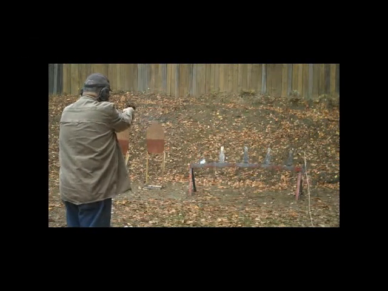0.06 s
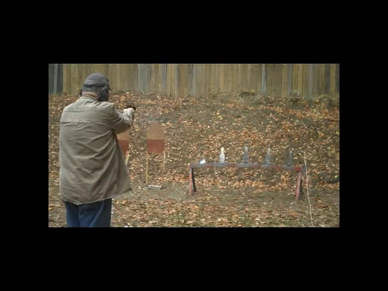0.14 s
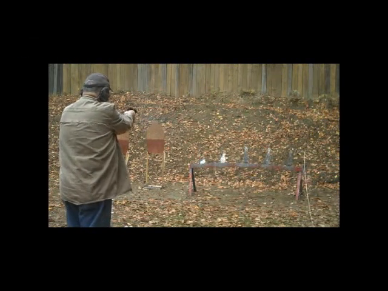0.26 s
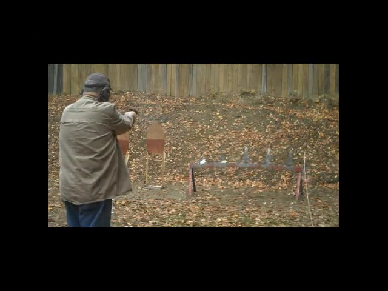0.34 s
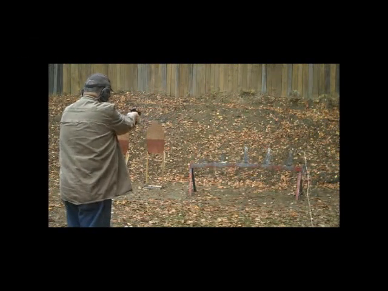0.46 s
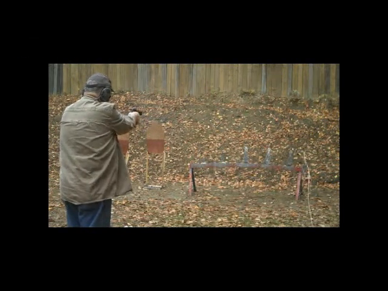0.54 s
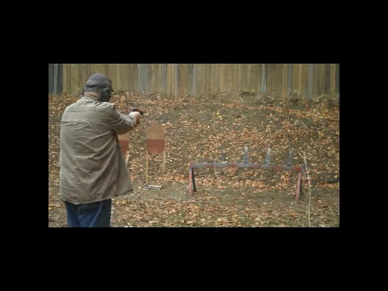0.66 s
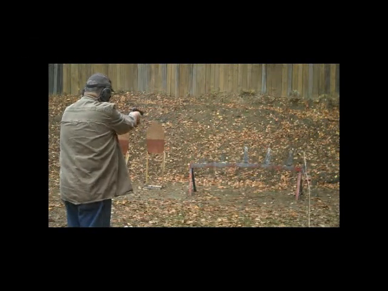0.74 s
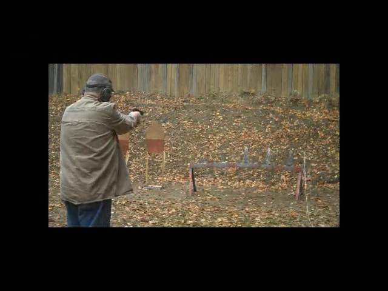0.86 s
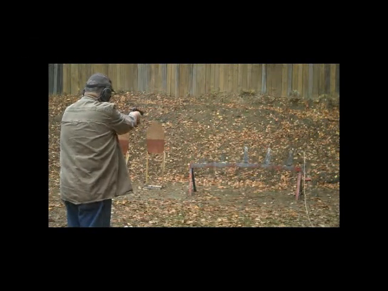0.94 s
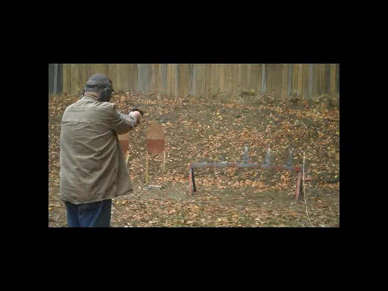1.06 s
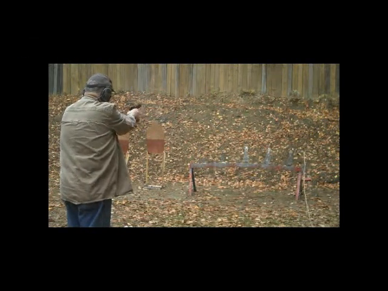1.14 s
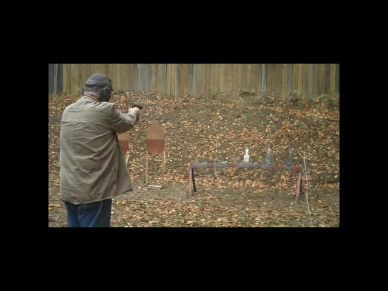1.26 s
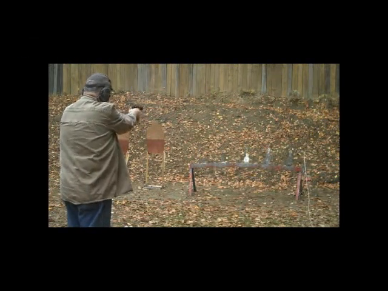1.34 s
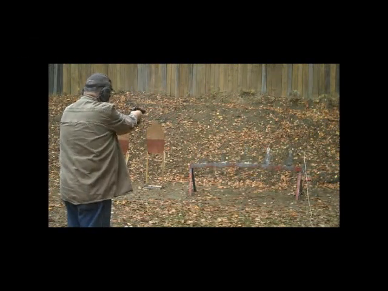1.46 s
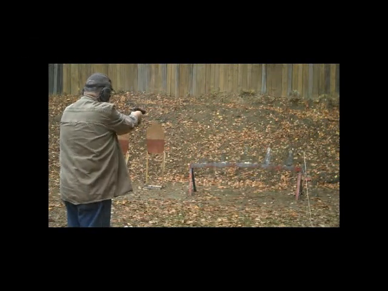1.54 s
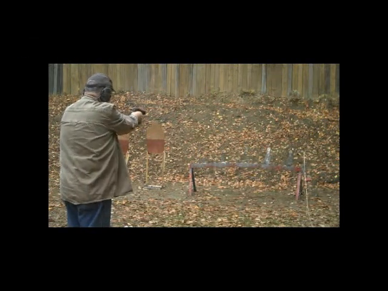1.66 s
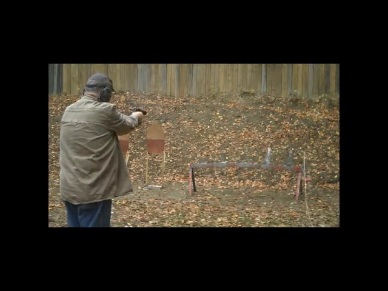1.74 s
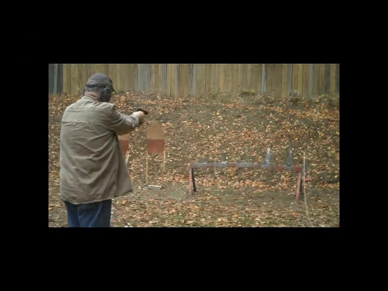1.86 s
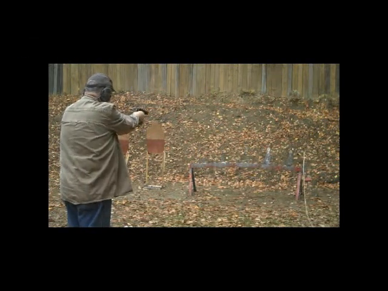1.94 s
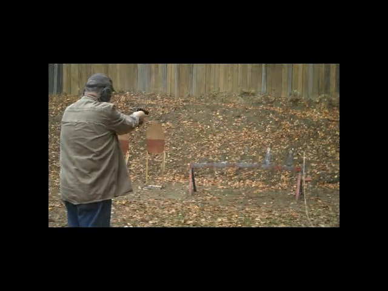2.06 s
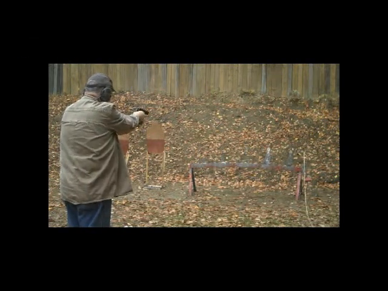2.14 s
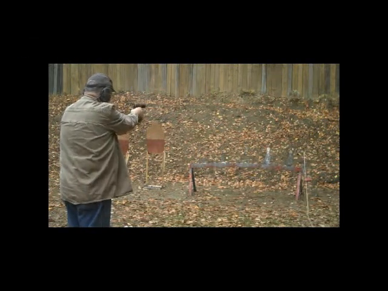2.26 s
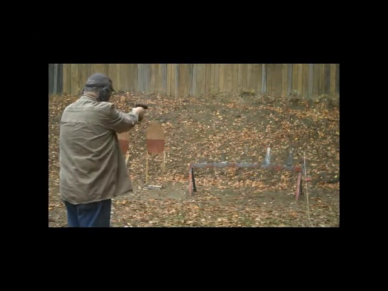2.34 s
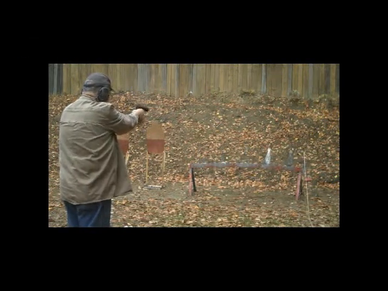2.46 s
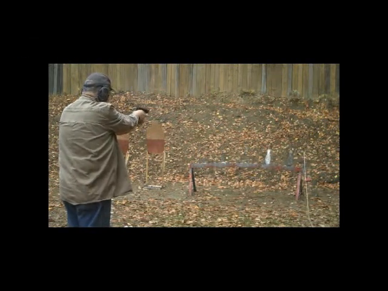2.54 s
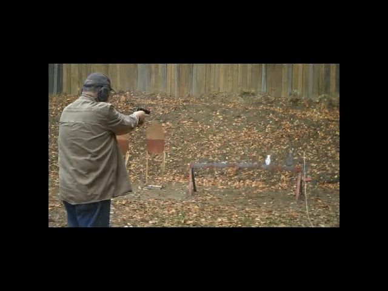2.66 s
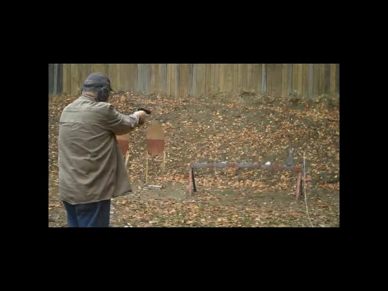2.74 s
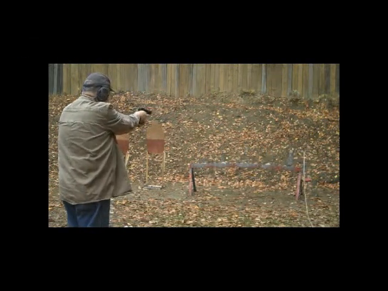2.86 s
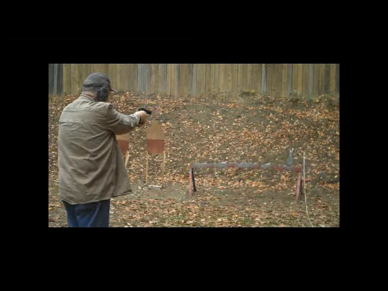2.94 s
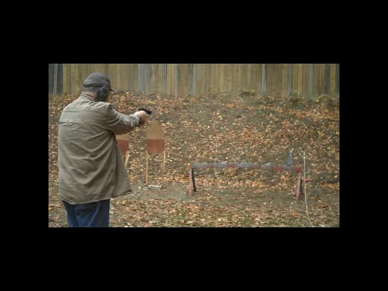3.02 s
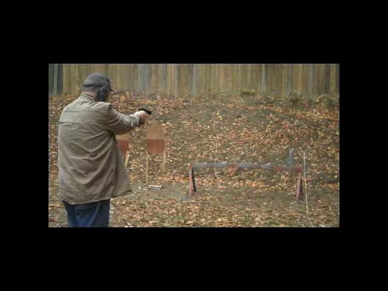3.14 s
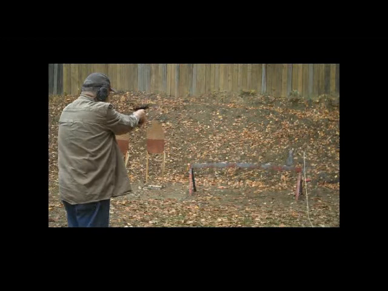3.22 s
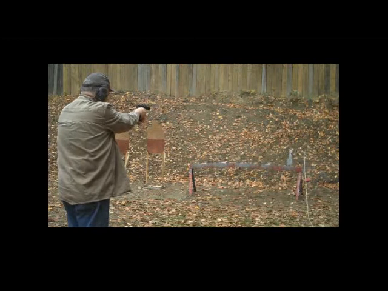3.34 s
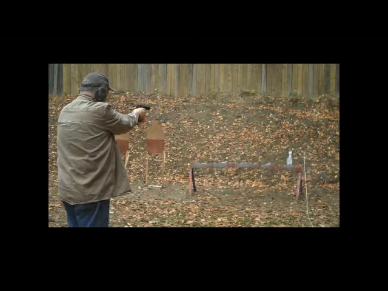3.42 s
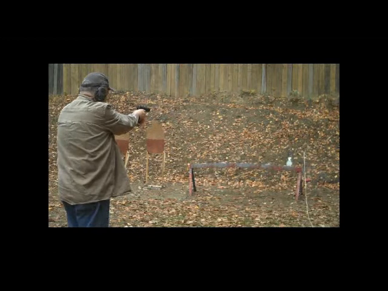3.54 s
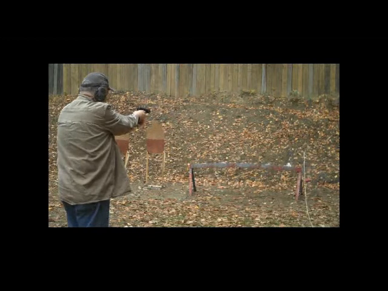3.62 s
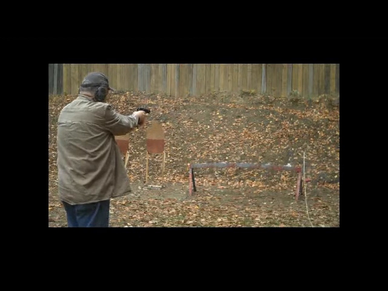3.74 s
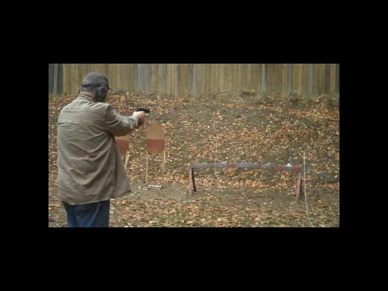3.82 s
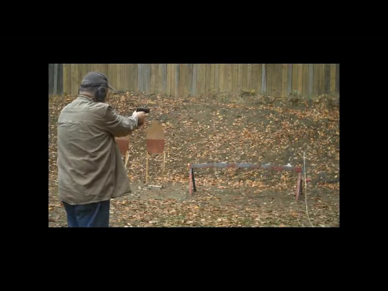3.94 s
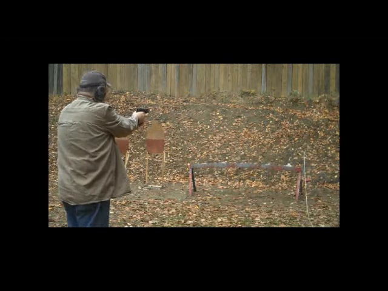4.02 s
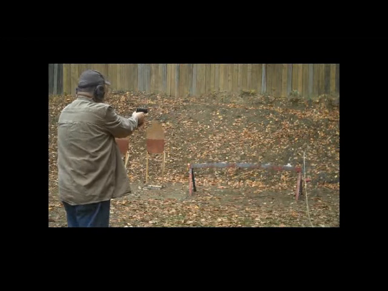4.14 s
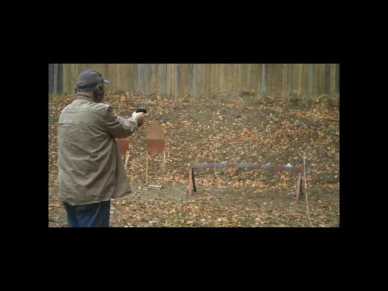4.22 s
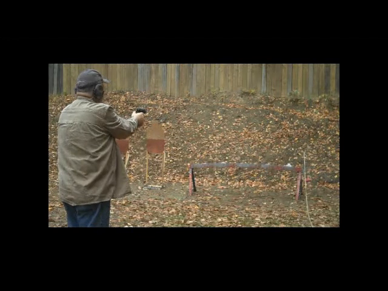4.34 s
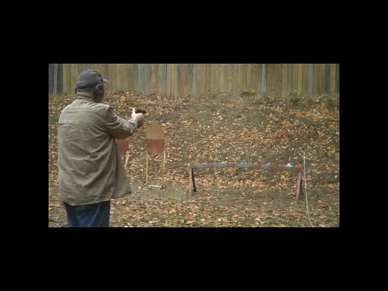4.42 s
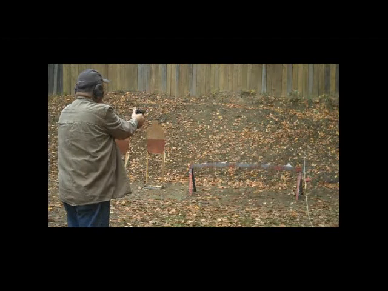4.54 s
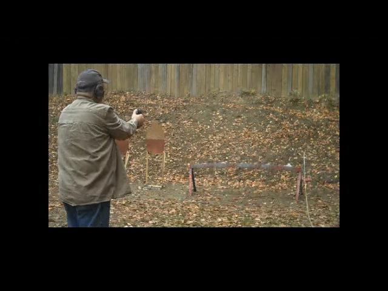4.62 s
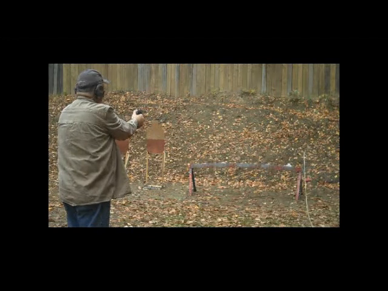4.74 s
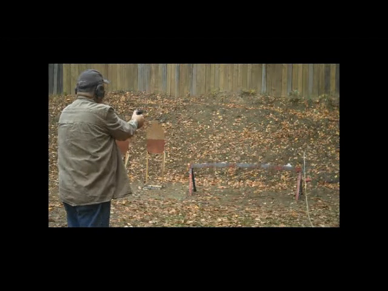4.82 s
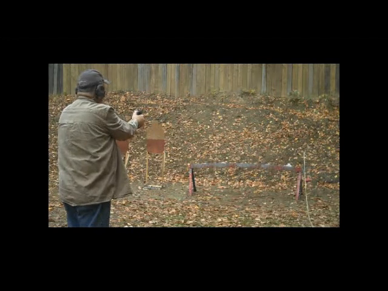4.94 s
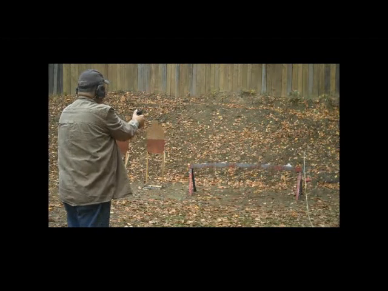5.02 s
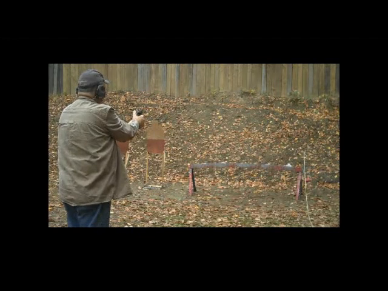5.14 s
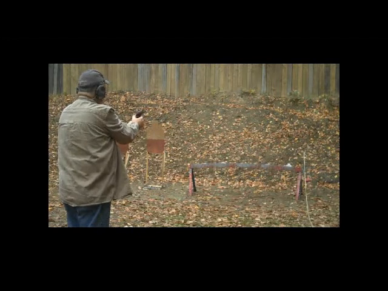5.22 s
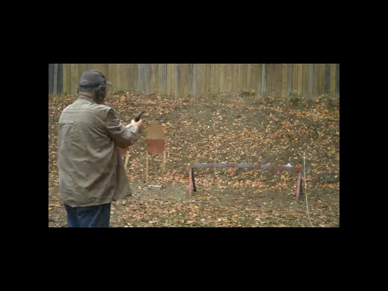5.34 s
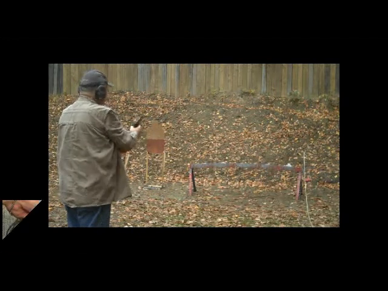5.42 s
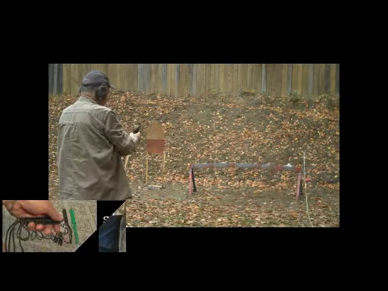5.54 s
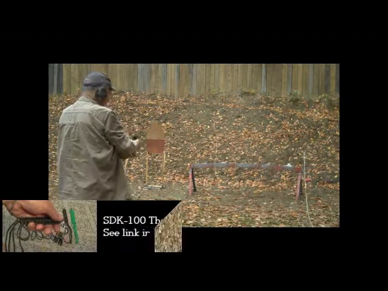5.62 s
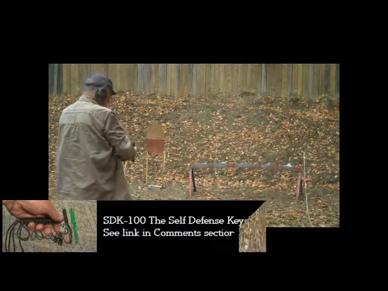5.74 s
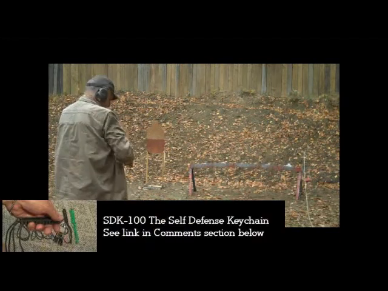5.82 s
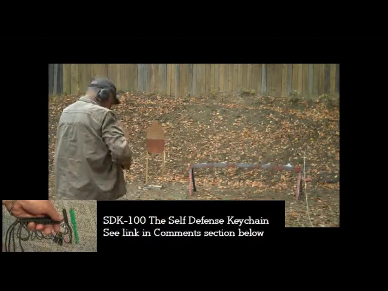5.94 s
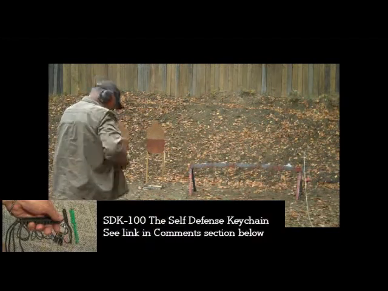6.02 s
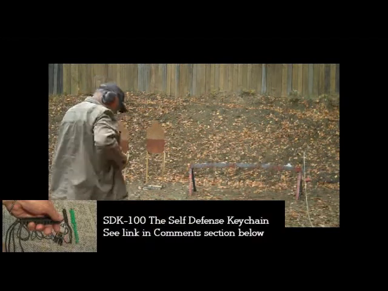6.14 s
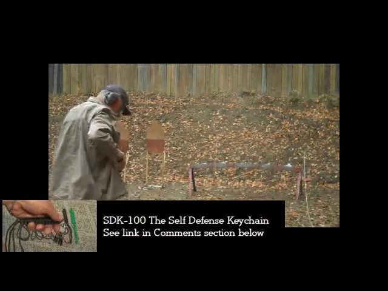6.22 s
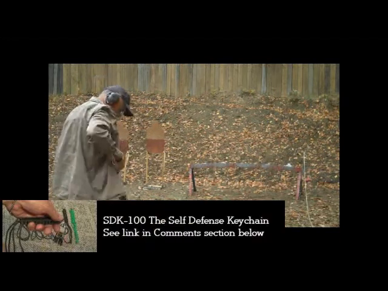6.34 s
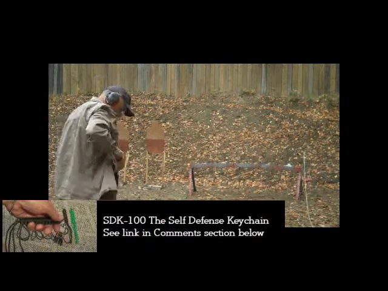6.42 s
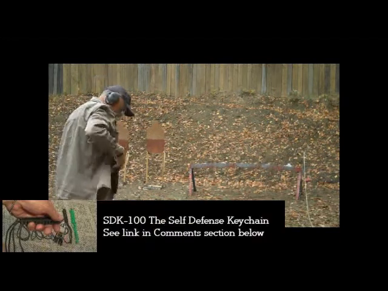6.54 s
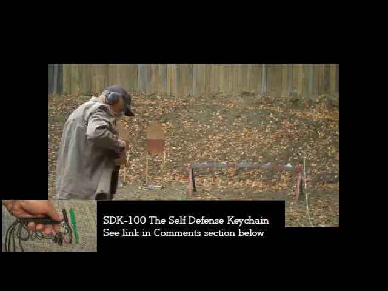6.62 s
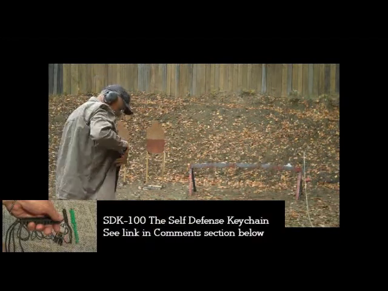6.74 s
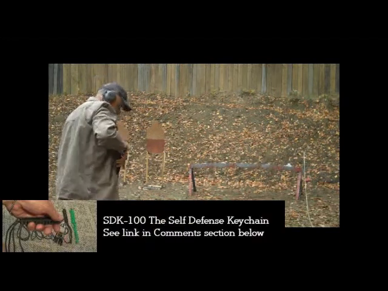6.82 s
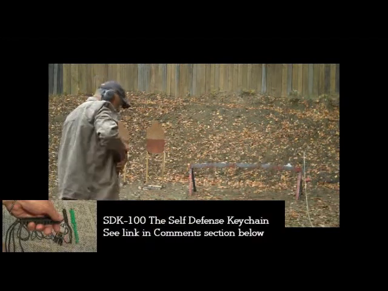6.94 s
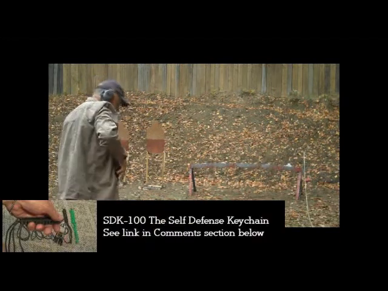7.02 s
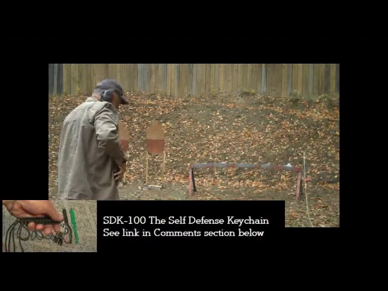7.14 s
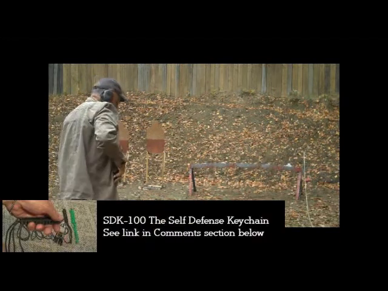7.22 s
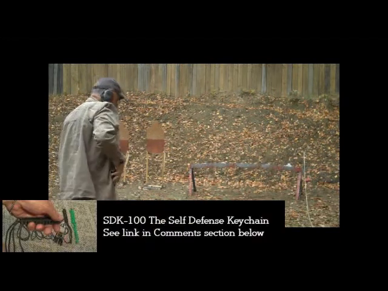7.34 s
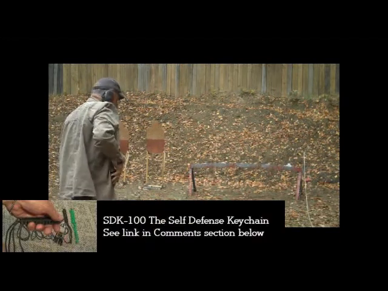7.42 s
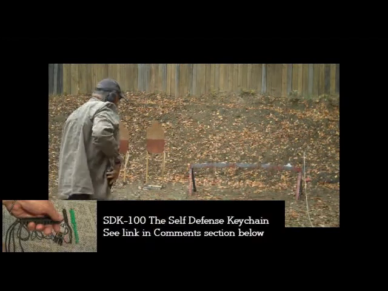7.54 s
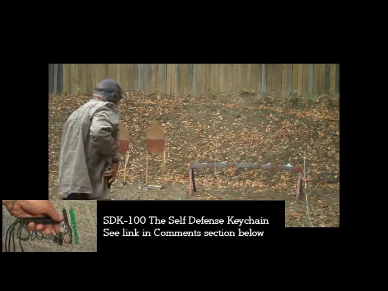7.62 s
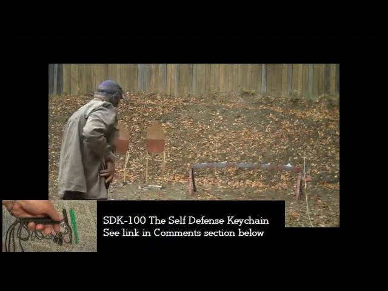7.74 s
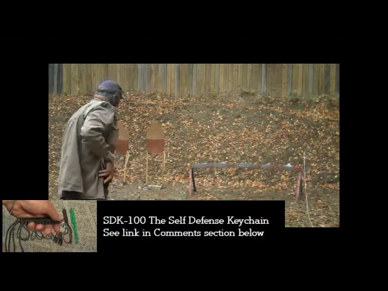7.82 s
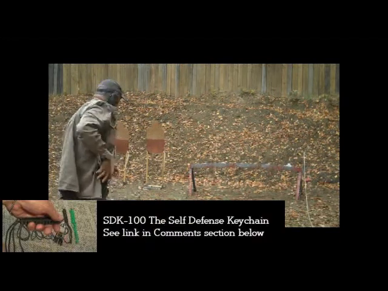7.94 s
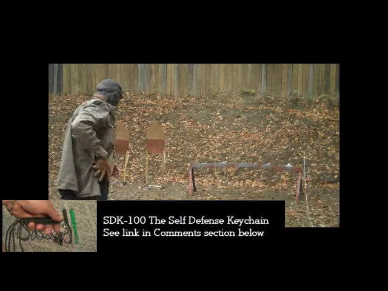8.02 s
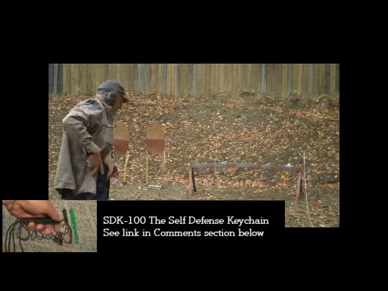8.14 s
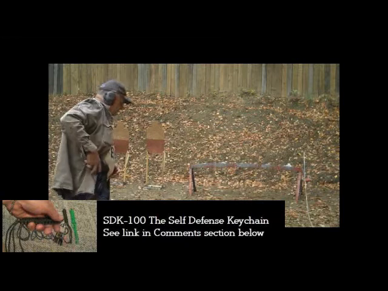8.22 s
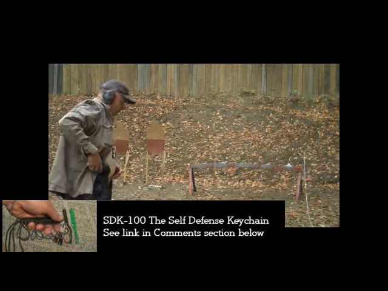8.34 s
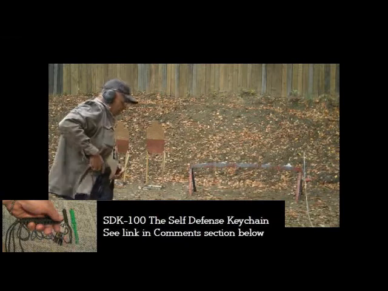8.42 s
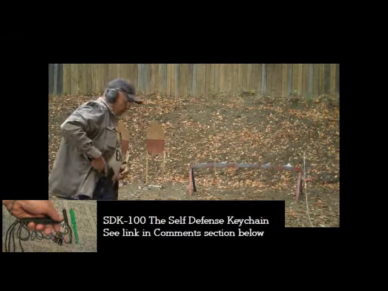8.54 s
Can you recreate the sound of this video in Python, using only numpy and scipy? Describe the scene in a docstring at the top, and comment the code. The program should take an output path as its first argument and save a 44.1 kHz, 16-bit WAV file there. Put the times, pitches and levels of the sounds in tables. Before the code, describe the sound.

The sound opens on the tail of a loud pistol shot outdoors, and three more follow at about 1.1, 2.2 and 3.2 seconds. Each blast echoes through the woods and sets a steel plate ringing with a high, wavering tone. About half a second after each shot the plate topples and clatters lightly on its rack. Spent brass cases ping faintly on the ground until about 4.5 seconds. At 4.8 seconds the slide snaps shut with a sharp metallic click. A very faint breeze lies underneath, with a distant insect barely trilling three times between 4.5 and 6 seconds. Small handling ticks follow, and from 6.3 to 7 seconds the pistol knocks and scrapes into a stiff, hollow holster. A jacket rustles softly from about 6 seconds, with a few sleeve swishes and one small click before the end at about 8.5 seconds.

```python
"""Outdoors, before a leafy bank and a wooden fence, we open on the tail of a pistol shot; three more follow.
Each bullet sets a steel plate ringing while the blast echoes through the woods. The plate topples and
clatters on its rack, and a brass case pings on the ground. After the last shot a far insect trills in
the breeze and the slide snaps shut. The pistol knocks and scrapes its way into a stiff holster under a
rustling jacket, and the sleeve swishes to close the scene."""
import sys
import numpy as np
from scipy import signal
from scipy.fft import rfft, irfft, next_fast_len
from scipy.io import wavfile
from scipy.ndimage import map_coordinates

SR = 44100
rng = np.random.default_rng(int(sys.argv[2]) if len(sys.argv) > 2 else 0)


def store_pcm(level_fs):
    """Save levels as 16-bit WAV."""
    pcm = np.round(np.clip(level_fs, -1, 1) * 32767).astype(np.int16)
    wavfile.write(sys.argv[1], SR, np.atleast_2d(pcm).T)


N = 377937
T = np.arange(2 * SR) / SR  # time since an event

# Colours are noise spectra: their levels are relative, per Hz.
# breeze colour: f/Hz, level/dB
BREEZE_COLOUR = [(15, -52.5), (25, -12), (42, -26.5), (173, -10), (286, -10.5), (425, -2.5), (684, -4),
                 (892, -3), (1680, -17), (2030, -17), (2380, -24.5), (3630, -20.5), (3930, -28.5),
                 (9170, -34), (14000, -55)]
# fader ride of the breeze: t/s, level/dB
BREEZE_RIDE = [(4.2, -64), (5.73, -67.5), (6.4, -64.5), (8.57, -62.5)]
# thin insect colour: f/Hz, level/dB
INSECT_COLOUR = [(3300, -50), (3520, -5), (3590, 0.5), (3660, -6), (3850, -50.5)]
# insect trills: middle t/s, level/dB, half length/s
TRILLS = [(4.6, -84, .15), (5.42, -79, .11), (6.05, -81, .15)]

# fader ride of the jacket's rubbing: t/s, level/dB
JACKET_RIDE = [(5.3, -74.5), (5.83, -69), (6.24, -64), (6.86, -59), (7.06, -61.5), (7.28, -61), (7.44, -61),
               (8.16, -61), (8.57, -59.5)]
# body movement, almost still while aiming: t/s, gain
MOVEMENT = [(5.1, 0.02), (5.9, 1)]
# cloth colour: f/Hz, level/dB
CLOTH_COLOUR = [(250, -29.5), (600, -2.5), (1100, 0), (2000, -6.5), (3200, -1.5), (4300, -11.5), (5300, -9),
                (7500, -13), (9400, -18), (11500, -29), (14000, -59)]
# colour of air stirred at the microphone: f/Hz, level/dB
RUMBLE_COLOUR = [(15, 1.5), (40, -3.5), (90, -8), (200, -18), (500, -50)]
# colour of sliding fabric: f/Hz, level/dB
SWISH_COLOUR = [(800, -18), (2000, -13), (2700, -4), (3150, 0.5), (3700, -5.5), (4300, -16.5), (5300, -9),
                (8000, -29), (13000, -35)]
# sleeve swishes: middle t/s, level/dB, half length/s
SWISHES = [(7.66, -60, 0.06), (8.03, -56.5, 0.12), (8.39, -60, .07)]

# hollow resonances of the holster: f/Hz, width/Hz, level/dB
HOLSTER_MODES = [(510, 220, -14), (883, 256, -4), (1303, 160, 3), (2360, 230, -6.5), (2870, 180, -8),
                 (3170, 320, -12.5), (5370, 720, -22)]
# scrapes along the holster: middle t/s, level/dB, half length/s
SCRAPES = [(6.32, -54, 0.0081), (6.755, -52, 0.024), (6.95, -48.5, 0.027)]
# knocks on the holster: t/s, level/dB
KNOCKS = [(6.2835, -19.5), (6.34, -33.5), (6.375, -36), (6.385, -29), (6.532, -42.5), (6.561, -39),
          (6.679, -39), (6.791, -24.5), (6.8071, -24), (6.882, -36.5), (6.989, -24.5)]
# colour of a hard edge ticking on the holster: f/Hz, level/dB
EDGE_COLOUR = [(250, -27), (700, -4), (1800, 1), (3000, 1.5), (4300, -3), (5800, -4.5), (8000, -13),
               (10500, -24), (12000, -36), (14000, -58)]

# colour of steel on steel: f/Hz, level/dB
STEEL_COLOUR = [(60, -20.5), (200, -6), (1500, -6), (2100, -3.5), (2800, 13.5), (4100, 2), (5300, 10.5),
                (6500, -1.5), (7400, 6.5), (10000, -11.5), (11400, -1), (13500, -54.5)]
# colour of the recoil spring's buzz: f/Hz, level/dB
SPRING_COLOUR = [(7000, -42), (8850, 0), (9500, -9.5), (10400, -22), (11400, 0), (12000, -8.5),
                 (13000, -40.5)]
# colour of a click coming back from the trees: f/Hz, level/dB
CLICK_TAIL_COLOUR = [(300, -20), (1500, -10), (2400, -.5), (5500, 1), (9000, -1.5), (11500, -13),
                     (13500, -36.5)]
# clicks of trigger and small parts: t/s, level/dB
CLICKS = [(1.067, -54), (6.062, -51), (6.123, -52.5), (8.099, -47)]
# colour of a dull tap on the grip: f/Hz, level/dB
GRIP_COLOUR = [(900, -25), (1600, -10), (2000, 3), (2500, -10), (4500, -16), (7000, -10), (10000, -25),
               (13000, -45)]

# brass cases landing: t/s, tick level/dB, ring level/dB, ring f/Hz
CASES = [(.718, -51.5, -62.5, 10400), (.954, -46.5, -59.5, 10380), (1.866, -50, -51.5, 10750),
         (2.969, -56.5, -66, 10700), (3.98, -43.5, -57.5, 10700), (4.46, -58.5, -82, 10900)]
# toppled plates landing on the rack: t/s, level/dB
FALLS = [(.362, -49.5), (1.441, -54.5), (1.635, -55.5), (2.78, -45.5), (3.615, -52)]
# colour of metal clatter: f/Hz, level/dB
CLATTER_COLOUR = [(500, -23), (1500, -6.5), (2800, -1.5), (4200, -9), (7000, -5), (10000, -21.5),
                  (12000, -27.5), (14000, -49)]
# colour of the narrow clank within it: f/Hz, level/dB
CLANK_COLOUR = [(2600, -49), (3150, -3), (3370, -5), (3600, -17), (4200, -46)]
# ring of the rack: f/Hz, level/dB
RACK_MODES = [(2880, -7.5), (3385, 0), (6300, -13)]

# modes of a long-ringing plate: f/Hz, level/dB, t60/s
LONG_RING = [(4803, .5, .9), (7684, 2.5, .65), (11530, -19, .58)]
# modes of a high-pitched plate: f/Hz, level/dB, t60/s
HIGH_RING = [(7025, 0, .35), (11000, -9, .8)]
# modes of a shorter-ringing plate: f/Hz, level/dB, t60/s
SHORT_RING = [(4204, 0, .48), (8027, -6, .72), (11890, -5, .72)]
# the plate each shot hits: modes, pitch ratio
PLATES = [(LONG_RING, 1), (HIGH_RING, 1), (SHORT_RING, 1), (LONG_RING, 1.0256)]
# how hard each plate is struck: level/dB
HIT_LEVELS = [-27, -39.5, -38.5, -30]

# colour of the dense scatter in the woods: f/Hz, level/dB
WOODS_COLOUR = [(25, -34.5), (80, -16.5), (140, -17.5), (260, -13.5), (520, -0.5), (900, -1.5),
                (1300, -6.5), (1800, -14.5), (3200, -12.5), (4300, -18), (7800, -16.5), (10000, -22.5),
                (13500, -35), (15000, -54)]
# reverb time of the woods: f/Hz, t60/s
WOODS_T60 = [(60, 0.15), (170, 0.67), (400, .7), (900, 0.76), (2000, 0.78), (4000, 0.76), (8000, 0.58),
             (13000, 0.39)]
# colour of the roll from distant trees: f/Hz, level/dB
ROLL_COLOUR = [(60, -44.5), (200, -23), (450, 0), (1000, 1), (1800, -12.5), (3500, -21.5), (7000, -31.5),
               (12000, -51)]
# slapbacks from bank and fence: delay t/s, level/dB
SLAPBACKS = [(0.039, 0), (.064, -3), (.073, 6), (.09, 2), (.123, 1), (.175, -2)]
# slapback colour before the surface dulls it: f/Hz, level/dB
SLAP_COLOUR = [(30, -22.5), (90, -11.5), (150, -3), (200, -2), (330, -1), (520, 7.5), (900, 0),
               (1400, -4.5), (3000, -15), (8000, -30.5)]
# colour of muzzle blast and bullet impact: f/Hz, level/dB
BLAST_COLOUR = [(88, -32.5), (150, -5.5), (1410, -2.5), (1770, -11.5), (2360, -8.5), (4100, -12.5),
                (5360, -12), (6620, -20.5), (7420, -12.5), (11500, -27.5), (14500, -31.5)]
# shots: t/s, blast level/dB, low push level/dB, down-range level/dB
SHOTS = [(-.066, -11.5, -15, -15.2), (1.094, -11.5, -17, -14), (2.1936, -11.5, -11.5, -13.5),
         (3.2085, -12, -14, -15.5)]
IMPACT_DELAY_S = .0335  # the hit is heard this long after the muzzle


def amp(db):
    """Decibels to gain."""
    return 10 ** (np.asarray(db) / 20)


def unit(x):
    """Scale to rms 1."""
    return x / np.sqrt(np.mean(x ** 2) + 1e-20)


def along(points, hz):
    """Read (f/Hz, value) points on a log axis."""
    f, v = np.transpose(points)
    return np.interp(np.log(hz + 1), np.log(f + 1), v)


def ride(rows):
    """A fader ride through (t/s, value) rows."""
    return np.interp(np.arange(N) / SR, *np.transpose(rows))


def fade(t60):
    """Exponential decay, 60 dB down after t60 seconds."""
    return np.exp(-np.log(1000) * T / t60)


def attack(rise_s):
    """Soft onset with time constant rise_s."""
    return 1 - np.exp(-T / rise_s)


def wobble(rate, size=len(T)):
    """A smooth random curve, rate knots a second."""
    return map_coordinates(rng.standard_normal(400), [np.arange(size) * rate / SR], mode="mirror")


def filtered(x, response):
    """Apply a frequency response to x."""
    m = next_fast_len(x.shape[-1] + 8192)
    return irfft(rfft(x, m) * response(np.fft.rfftfreq(m, 1 / SR)), m)[..., :x.shape[-1]]


def noise(colour, size=len(T)):
    """Coloured noise of rms 1."""
    return unit(filtered(rng.standard_normal(size), lambda hz: amp(along(colour, hz))))


def add(track, s, sound):
    """Mix a sound into the track from time s."""
    start = round(s * SR)
    part = sound[max(-start, 0):N - start]
    track[max(start, 0):][:len(part)] += part


def strokes(rows):
    """Envelope of a row of strokes, each swelling and easing off."""
    t = np.arange(N) / SR
    return sum(amp(db) * np.exp(-((t - s) / half) ** 2 / 2) for s, db, half in rows)


def scattered(span_s, db, count):
    """(t/s, level/dB) rows of small events spread unevenly over a span."""
    start, end = span_s
    chance = rng.random((count, 2))
    times = start + (end - start) * (np.arange(count) + chance[:, 0]) / count
    return list(zip(times, db + 6 * (chance[:, 1] - .5)))


def die_away(x):
    """Among the trees each frequency dies at its own speed."""
    hz, t, spectrum = signal.stft(x, SR, nperseg=256)
    decay = np.exp(-np.log(1000) * t / along(WOODS_T60, hz)[:, None])
    return signal.istft(spectrum * decay, SR, nperseg=256)[1][:len(x)]


def outdoors(x, wet_db):
    """A close sound with a faint tail of scatter from the surroundings."""
    tail = die_away(rng.standard_normal(len(T)))
    return x + amp(wet_db) * signal.fftconvolve(x, tail / np.linalg.norm(tail))[:N]


def breeze():
    """The bed: light air wavering in the trees."""
    trim_db = 1.45
    return amp(ride(BREEZE_RIDE) + trim_db + .35 * wobble(5, N)) * noise(BREEZE_COLOUR, N)


def insect():
    """A far insect trills in thin, narrow-band swells."""
    return strokes(TRILLS) * noise(INSECT_COLOUR, N)


def jacket():
    """As the body turns, cloth rubs in small catches and stirs the air; the sleeve swishes on each reach."""
    rubbing = ride(MOVEMENT) * amp(ride(JACKET_RIDE))
    cloth = rubbing * amp(1.17) * noise(CLOTH_COLOUR, N)
    sleeve = strokes(SWISHES) * noise(SWISH_COLOUR, N)
    rumble = rubbing * amp(-14) * noise(RUMBLE_COLOUR, N)
    catches = amp(1.3 * wobble(40, N))
    return (cloth + sleeve) * catches + rumble


def holster_shell(hz):
    """Response of the stiff hollow shell: resonances of alternating polarity."""
    return sum((-1) ** k * amp(db) * 1j * hz * width / (centre ** 2 - hz ** 2 + 1j * hz * width)
               for k, (centre, width, db) in enumerate(HOLSTER_MODES))


def holster():
    """The pistol scrapes, knocks and rattles in the shell; a hard edge puts a tick on each knock."""
    slips = rng.standard_normal(N) * amp(5.7 * wobble(300, N))
    grit = unit(filtered(slips, holster_shell))
    out = strokes(SCRAPES) * (.81 * grit + .48 * noise(SWISH_COLOUR, N))
    rattles = scattered(span_s=(6.5, 7), db=-44.5, count=4)
    for s, db in KNOCKS + rattles:
        knock = filtered(rng.standard_normal(len(T)) * fade(.018), holster_shell)
        tick = amp(-13.5) * noise(EDGE_COLOUR) * fade(.04)
        add(out, s, amp(db) * (knock / np.abs(knock).max() + tick))
    return outdoors(out, wet_db=-18)


def pistol_action():
    """The slide slams home and shakes its spring; small parts tick as the gun is handled."""
    out = np.zeros(N)
    home_s, home_db = 4.8332, -22
    # the slide rubs along its rails, slams home, and the barrel locks
    slide = [(home_s - .0042, home_db - 22), (home_s, home_db), (home_s + .0036, home_db - 5.5)]
    grip_shifts = scattered(span_s=(5.5, 5.9), db=-66.5, count=5)
    jolt = amp(-31.5) * fade(.026) * attack(.0005)  # the frame jumps in the hand
    for s, db in slide + CLICKS + grip_shifts:
        contact = noise(STEEL_COLOUR) * (fade(.015) + amp(-19.5) * fade(.08))
        spring = noise(SPRING_COLOUR) * (amp(-16) * fade(.04) + amp(-37) * fade(.5))
        tail = amp(-30) * die_away(noise(CLICK_TAIL_COLOUR))
        add(out, s, amp(db) * (contact + jolt + spring + tail))
    add(out, 5.493, amp(-59) * noise(GRIP_COLOUR) * fade(.04))  # a tap on the grip as the gun is lowered
    return out


def brass_cases():
    """Each spent case ticks on the ground and pings; a dented rim splits the ping into a beating pair."""
    out = np.zeros(N)
    split_hz = 60
    for s, tick_db, ring_db, hz in CASES:
        tick = amp(tick_db) * noise(CLATTER_COLOUR) * fade(.012)
        ring = np.sin(2 * np.pi * hz * T) + .4 * np.sin(2 * np.pi * (hz + split_hz) * T)
        add(out, s, tick + amp(ring_db) * ring * fade(.19))
    return outdoors(out, wet_db=-14.5)


def plate_falls():
    """Each toppled plate clatters onto the rack, rings it and rebounds once."""
    out = np.zeros(N)
    rebound_s, loss_db = .14, 9
    rebounds = [(s + rebound_s, db - loss_db) for s, db in FALLS]
    for s, db in FALLS + rebounds:
        clatter = amp(2.2 * wobble(180)) * noise(CLATTER_COLOUR)
        clank = amp(-3) * noise(CLANK_COLOUR)
        ring = sum(amp(level) * wobble(90) * np.sin(2 * np.pi * hz * T) for hz, level in RACK_MODES)
        add(out, s, amp(db) * ((clatter + clank) * fade(.37) + amp(-5) * unit(ring) * fade(.38)))
    return out


def plate_rings():
    """Each hit sets a steel plate ringing; its tilt and scatter from the ground make each tone waver."""
    out = np.zeros(N)
    tilt_hz = 5.5
    for (s, *_), (modes, pitch), hit_db in zip(SHOTS, PLATES, HIT_LEVELS):
        for hz, db, t60 in modes:
            tilt = np.cos(2 * np.pi * tilt_hz * T + 1.4 * wobble(8))
            scatter = wobble(30) + 1j * wobble(27)
            waver = .9 * tilt + .5j + .42 * scatter  # moves both level and phase
            tone = np.real(waver * np.exp(2j * np.pi * hz * pitch * T))
            add(out, s + IMPACT_DELAY_S, amp(hit_db + db) * tone * fade(t60) * attack(.002))
    return out


def range_echo():
    """The tail of a shot: dense scatter, a long roll from distant trees and dull slapbacks."""
    scatter = amp(-2.5) * die_away(noise(WOODS_COLOUR)) * attack(.011)
    roll = amp(-19.5) * noise(ROLL_COLOUR) * fade(1.86) * attack(.13)
    out = scatter + roll
    blur = fade(.046) * attack(.0073)  # rough surfaces smear each slap
    # delay t/s, level/dB, low-pass f/Hz
    soft_ground = [(.014, -.1, 300)]
    bank_and_fence = [(s, db, 1250) for s, db in SLAPBACKS]
    trunks = [(s, db, 450) for s, db in scattered(span_s=(.14, .23), db=-17.5, count=3)]
    for delay, db, cutoff_hz in soft_ground + bank_and_fence + trunks:
        slap = unit(filtered(noise(SLAP_COLOUR), lambda hz: 1 / np.sqrt(1 + (hz / cutoff_hz) ** 6)))
        out += amp(db) * np.interp(T - delay, T, slap * blur, left=0)
    return out


def shots():
    """Muzzle blast with its low push, the range's answer, and the bullet's impact down range."""
    out = np.zeros(N)
    shared_echo = range_echo()  # the same trees answer every shot, so part of the tail repeats
    push_s, burst_s = .009, .012
    push = -(1 - T / push_s) * np.exp(-T / push_s) * attack(.00089)
    burst = fade(.96) / np.sqrt(1 + (T / burst_s) ** 4)
    for s, blast_db, push_db, range_db in SHOTS:
        add(out, s, amp(blast_db) * noise(BLAST_COLOUR) * burst + amp(push_db) * push)
        add(out, s, amp(range_db) * (.5 * shared_echo + .89 * range_echo()))
        impact = amp(range_db - 1.6) * noise(BLAST_COLOUR) * fade(.093)
        add(out, s + IMPACT_DELAY_S, impact)
    return out


def scene():
    """The mix: all sources lie ahead, so the image is nearly mono."""
    shooting = shots() + plate_rings() + plate_falls() + brass_cases()
    foley = pistol_action() + holster() + jacket()
    mono = shooting + foley + breeze() + insect()
    lag_s = 2.4e-6  # tiny left-right delay, a faint width in the treble
    return filtered(mono, lambda hz: np.exp(1j * np.pi * hz * lag_s * np.array([[1], [-1]])))


def record(dry):
    """The microphone rounds off the loudest peaks; a steep low-pass trims the very top."""
    ceiling, hardness, cutoff_hz = .58, 4, 14300
    rounded = dry / (1 + np.abs(dry / ceiling) ** hardness) ** (1 / hardness)
    return filtered(rounded, lambda hz: 1 / np.sqrt(1 + (hz / cutoff_hz) ** 120))


dry = scene()
out = record(dry)
store_pcm(out)
```